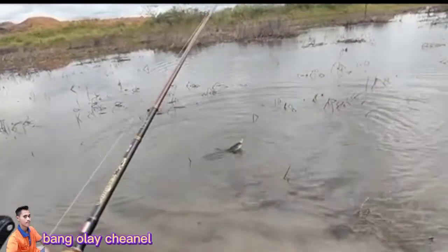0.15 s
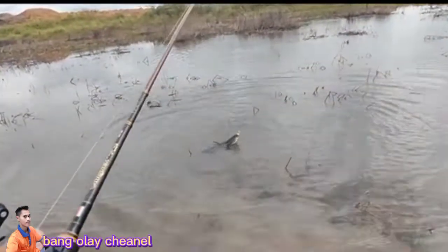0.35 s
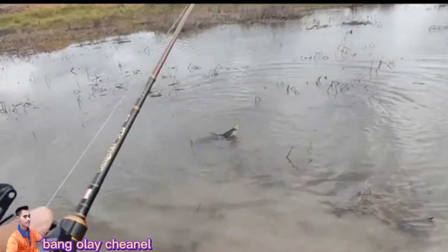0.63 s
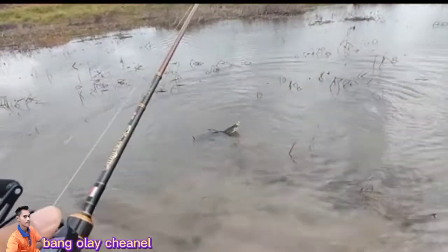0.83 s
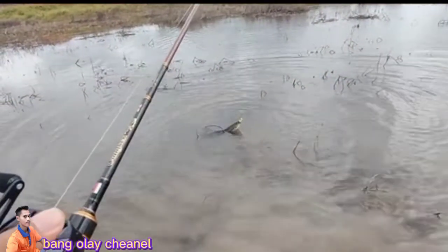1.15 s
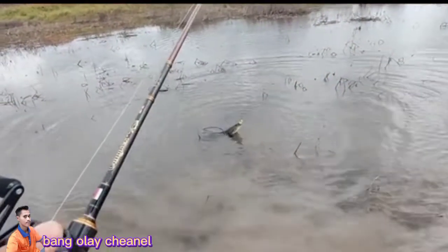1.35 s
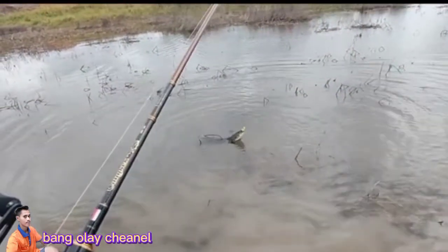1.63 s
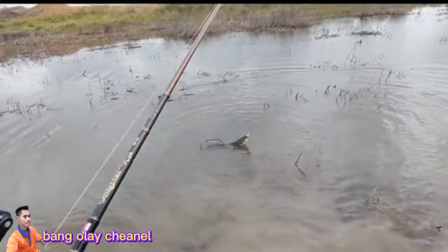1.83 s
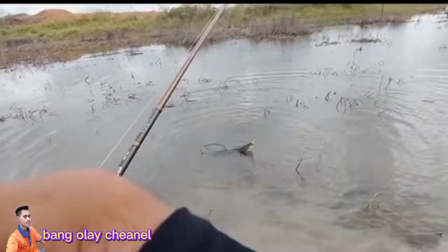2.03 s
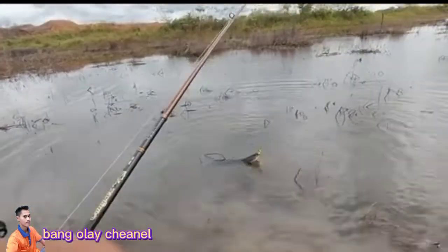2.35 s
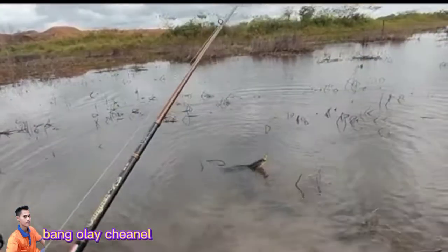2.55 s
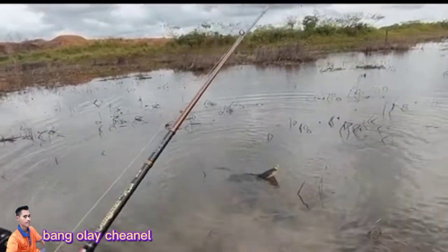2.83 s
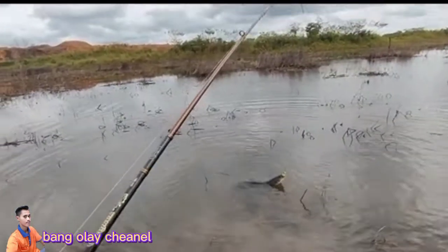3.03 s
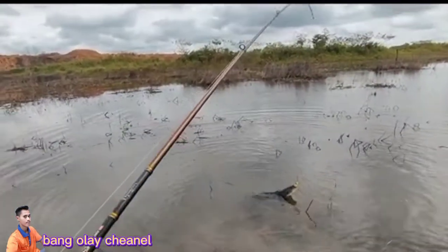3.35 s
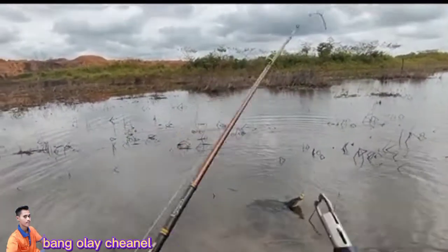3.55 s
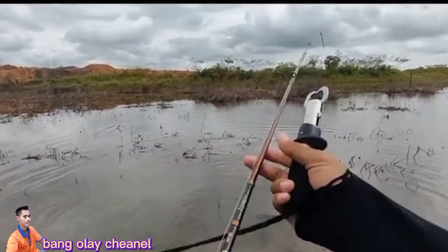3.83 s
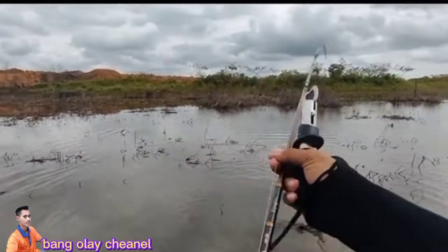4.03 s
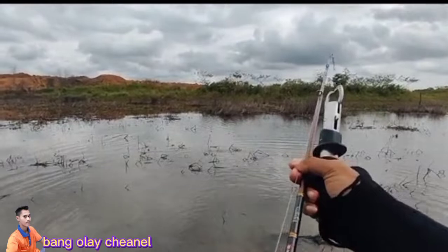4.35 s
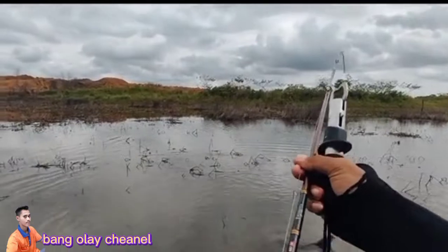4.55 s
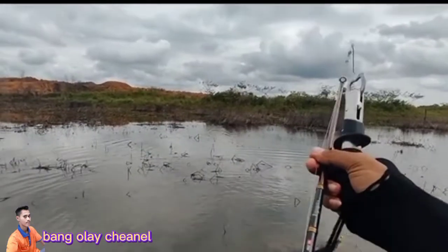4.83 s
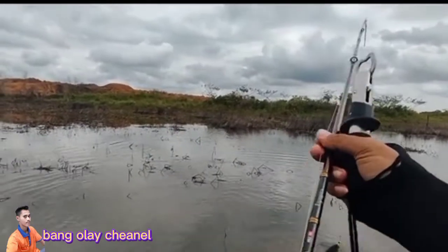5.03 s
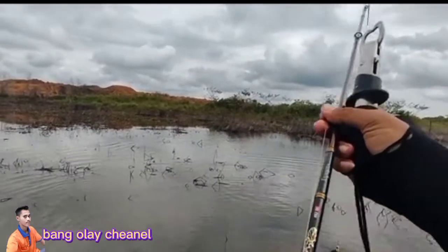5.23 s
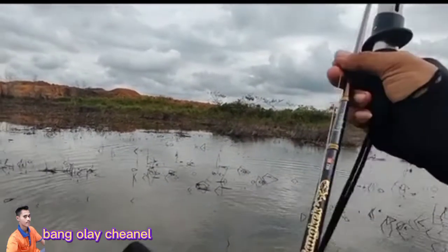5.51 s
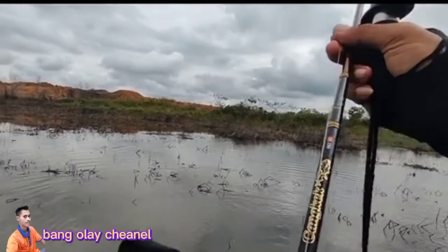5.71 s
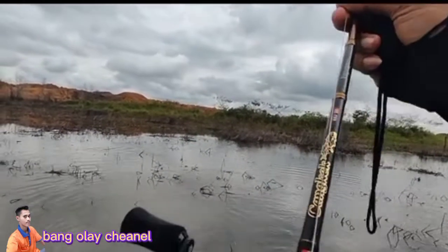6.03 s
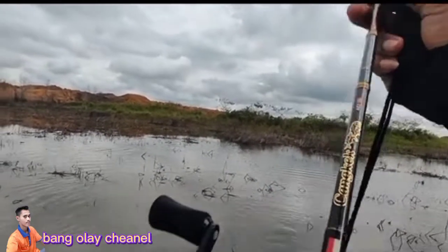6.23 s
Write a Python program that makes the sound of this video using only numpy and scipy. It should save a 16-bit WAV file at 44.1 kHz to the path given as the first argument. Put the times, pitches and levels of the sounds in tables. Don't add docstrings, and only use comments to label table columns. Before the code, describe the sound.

Faint bird peeps and twitters over soft breeze and thin insect shimmer, with cloth rub, a hard tap, small clicks and one loud hollow knock.

```python
import sys
import numpy as np
from scipy import signal
from scipy.fft import rfft, irfft, next_fast_len
from scipy.io import wavfile
from scipy.ndimage import uniform_filter1d, map_coordinates

SR = 44100
rng = np.random.default_rng(int(sys.argv[2]) if len(sys.argv) > 2 else 0)


def master_out(mix):
    frames = np.transpose(np.atleast_2d(mix))
    ceiling = np.clip(frames, -1, 1)
    pcm = np.round(ceiling * 32767).astype(np.int16)
    wavfile.write(sys.argv[1], SR, pcm)


def ratio_of_db(decibels):
    return 10 ** (np.asarray(decibels, float) / 20)


N = 281358

# time_s, level_db
BREEZE_CURVE = [(0, -36.5), (.41, -34), (.53, -33.5), (.87, -38.5), (1.06, -37.5), (1.49, -36), (2.22, -36),
                (2.59, -35.5), (3.25, -35.5), (4.25, -35.5), (4.8, -37), (5.63, -35), (5.9, -37),
                (6.38, -35.5)]
# freq_hz, density_db_per_hz
RUMBLE_SPECTRUM = [(12, -21), (20, 3), (30, -5.5), (70, 1.5), (91, -1), (112, -7), (264, -6.5),
                   (363, -12.5), (393, -13.5), (576, -14), (720, -20), (900, -32), (1170, -78),
                   (1980, -120)]
# freq_hz, correlation
RUMBLE_LIKENESS = [(25, 0.42), (60, 0.94), (130, 0.72), (300, 0.89), (600, 0.73), (1200, 0.083)]
# freq_hz, density_db_per_hz
HISS_SPECTRUM = [(500, 13.5), (900, 12.5), (1500, 7), (3000, 7), (6000, 4), (10000, 1.5), (13000, 1.5),
                 (15500, 0.5)]
# time_s, level_db
INSECT_CURVE = [
    (0, -42),
    (.21, -45.5),
    (.5, -42),
    (.87, -46),
    (1.1, -47.5),
    (1.5, -45),
    (2.6, -45),
    (3.25, -42.5),
    (4.4, -41.5),
    (6.38, -40),
]
# center_hz, width_hz, level_db
WING_MODES = [(8597, 1060, 11), (10050, 1100, -1.5)]
# start_s, pitch_hz, peak_db
PINGS = [(1.508, 1920, -28), (1.665, 1910, -25), (1.888, 1940, -33), (2.015, 1890, -27), (2.5, 5840, -25),
         (3.452, 1900, -29), (3.461, 1390, -28), (4.116, 1880, -27), (4.118, 1070, -33), (4.484, 950, -26),
         (4.537, 1900, -35), (.803, 7400, -29), (.643, 1340, -21), (5.443, 6200, -31)]
# center_s, pitch_hz, peak_db
PUSHES = [
    (0.416, 62, -22.5),
    (1.489, 43, -26.5),
    (1.6495, 477, -25.5),
    (1.6525, 620, -24.5),
]
# center_hz, width_hz, level_db
SHELL_MODES = [(1450, 500, -1.5), (2050, 260, 7.5), (2780, 780, -5.5)]
# center_hz, width_hz, level_db
HOLLOW_MODES = [(275, 150, -6.5), (1067, 135, 2.5)]
# start_s, length_s, level_db
SCRAPES = [
    (1.604, .042, -37),
    (2.81, .03, -47),
    (4.53, .06, -48),
    (5.285, .03, -43),
    (5.45, .13, -42),
    (5.918, .034, -37),
    (4.572, .02, -42),
    (6.22, .06, -48),
]
# start_s, ring_db, crack_over_ring_db, left_over_right_db
KNOCKS = [(0.595, -24, -14, -3), (0.803, -33, 16, 4), (1.612, -17.5, 4, -2), (1.653, -31, 7, 1),
          (2.062, -29.5, -6, -2), (2.503, -24, 7, -1), (2.545, -25.5, -12, .6), (2.595, -27.5, -5.5, -3),
          (2.702, -29.5, -10, -3), (2.75, -32.5, 14, -1), (3.707, -27, 2, -5), (4.2837, -3.5, 0.5, -3.5),
          (4.296, -28, 16, -5), (4.317, -26, -8, 0), (4.584, -18.5, -12, -2.5), (4.857, -22.5, 8.5, -4),
          (5.481, -29, -5, -3), (5.504, -26, -2, 2), (5.537, -22.5, -2, -4), (5.562, -17.5, -19, 0),
          (5.622, -27.5, 13.5, -9), (5.709, -26.5, 11, -6), (5.934, -31, -6, -9), (6.277, -30, -2, 1.5)]
# start_s, ring_db, crack_over_ring_db, left_over_right_db
TAPS = [(0.203, -34, -5, 4.5), (.874, -5, 3.5, 3.5), (0.8792, -25.5, 6, 1.5), (1.605, -22, 4, 11),
        (1.629, -17, 2, 8), (1.634, -23.5, -13, -7), (2.4, -27, 7, 0), (2.662, -35, 15, 1),
        (2.823, -26, 9, -1), (4.116, -33, 2, 0), (5.294, -32, 15, .6), (5.456, -27, 6, 0),
        (5.527, -22, 0, 0)]
# time_s, level_db, left_over_right_db
SLEEVE_CURVE = [
    (.1, -60, 13),
    (.19, -42.5, 6),
    (.22, -35.5, 7.5),
    (.33, -33.5, 5),
    (.42, -34, 1.5),
    (.5, -37.5, -8.5),
    (.58, -37, -2.5),
    (.63, -43.5, -8),
    (.72, -44.5, 9),
]
# freq_hz, density_db_per_hz
CLOTH_SPECTRUM = [(180, -39), (300, -5.5), (348, -3), (476, -10), (581, -9), (1180, -8.5), (2930, -5),
                  (4210, -13), (8840, -15), (15500, -23.5)]
# start_s, length_s, start_hz, end_hz, level_db
FLICKS = [(.048, 0.021, 3900, 4440, -37), (0.18, 0.023, 3400, 4300, -34), (.176, .028, 4250, 2400, -40),
          (.015, 0.014, 4900, 4100, -42), (.105, 0.021, 4300, 2700, -37), (.8, 0.03, 4400, 3900, -48),
          (.845, 0.018, 3200, 3900, -49), (0.76, 0.018, 3800, 3800, -39), (0.84, 0.022, 3750, 2400, -35),
          (0.8, 0.017, 3150, 3630, -50), (4.655, 0.037, 5750, 5000, -50), (4.71, .022, 5250, 4800, -47),
          (7.1, .012, 3400, 3400, -38), (2.1, .025, 2600, 2200, -46), (1.685, .03, 3800, 3800, -39),
          (4, .032, 3800, 2300, -31), (3.548, 0.018, 3700, 3300, -42), (4.7, .03, 3300, 3800, -39),
          (3.995, 0.024, 4000, 3300, -47), (2.1, 0.033, 3200, 3700, -35), (2.755, .016, 1800, 2720, -38),
          (5.138, 0.023, 3520, 3660, -42), (5.148, .028, 5300, 5600, -50), (5.64, .03, 3800, 3620, -46),
          (2.5, 0.012, 3500, 3900, -35.5), (2.175, 0.013, 3500, 2600, -42.5),
          (2.715, .014, 3400, 2800, -45), (2.262, 0.027, 3600, 3340, -41.5), (2.53, .032, 3000, 3750, -41),
          (1.8, .012, 5100, 4100, -43), (3.2, 0.023, 3800, 4700, -28), (3.4, 0.018, 4400, 3400, -36),
          (2.6, 0.018, 3420, 4800, -30.5), (2.94, 0.022, 3600, 3900, -35), (2.978, 0.008, 4370, 3000, -35),
          (2.991, 0.018, 3650, 4350, -27), (3.6, 0.015, 2470, 3300, -40), (3.026, 0.066, 4110, 2260, -38)]
# start_s, length_s, start_hz, end_hz, level_db
WHISTLES = [(.17, 0.067, 5520, 5000, -39.5), (.325, 0.061, 2450, 4050, -39), (.778, 0.1, 1970, 2040, -48),
            (1.008, 0.089, 2400, 3780, -44.5), (1.074, 0.037, 4470, 4100, -52),
            (1.2, 0.11, 2920, 2410, -42), (1.41, 0.14, 1450, 1400, -52.5), (2.128, 0.054, 2900, 1900, -43),
            (2.207, 0.044, 1930, 2820, -54), (2.352, 0.057, 3210, 3210, -38),
            (2.469, 0.07, 2650, 2050, -43), (2.725, 0.049, 2780, 2790, -35),
            (2.668, 0.012, 3300, 4120, -43), (1.915, 0.027, 3850, 3330, -51),
            (2.881, 0.082, 2280, 1780, -47.5), (3.2, 0.037, 2900, 2680, -45),
            (3.24, 0.098, 2610, 3100, -41), (3.305, 0.054, 3050, 4250, -41),
            (3.447, 0.055, 2790, 2500, -39), (3.644, 0.073, 2050, 2800, -46), (3.695, .05, 2750, 3950, -46),
            (3.875, 0.047, 1870, 1650, -48), (5.408, 0.043, 4050, 4100, -49),
            (6.216, 0.055, 4310, 4320, -40.5)]
# freq_hz, gain_db
THROAT_RESPONSE = [(500, 4), (1200, 1), (1750, -13), (2250, -17), (2800, -7.5), (3300, -7), (3800, -14),
                   (4300, -15), (5150, -7), (5750, -21), (6500, -40)]
# top_s, top_hz, level_db, throat_resonance_db, length_ratio
LOW_PEEPS = [(.117, 1300, -37.5, 5.5, 1.1), (.389, 1163, -40, -10, 1.23), (.68, 1225, -38, -1.5, 1.1),
             (.945, 1096, -42.5, 3.5, 0.78), (1.223, 1117, -43, 5, 0.92), (1.515, 920, -44.5, 3.5, .55),
             (1.762, 1190, -39, 4, 1.19), (2.042, 1098, -37.5, 3.5, 0.85), (2.31, 1042, -41.5, 4.5, 0.65),
             (2.588, 1026, -38, 2.5, 0.74), (2.845, 942, -35.5, -4, .7), (3.118, 928, -43.5, 3.5, 0.97),
             (3.39, 925, -46.5, 9, .75), (3.621, 1042, -40, 2.5, 0.88), (3.901, 1054, -41, 3, .7),
             (4.208, 759, -44, -3, .9), (4.406, 1087, -41, 5, 0.86), (4.904, 1116, -36.5, 0.5, 0.83),
             (5.184, 928, -40.5, 2, 0.68), (5.428, 1028, -42, -5, 0.75), (5.695, 1050, -44, 8, 0.63),
             (6.172, 1012, -41.5, 5, 0.83)]
# top_s, top_hz, level_db, throat_resonance_db, length_ratio
HIGH_PEEPS = [(.008, 1814, -41, -2, 0.66), (.703, 1750, -45, -3, 1.01), (.975, 1713, -47.5, -5, 0.85),
              (1.592, 1754, -40, -3, 1.1), (1.8, 1750, -44, -4, 1.07), (2.045, 1734, -42, -1, 1.1),
              (2.379, 1707, -39.5, -1, 0.9), (2.61, 1630, -48, -1.5, 0.96), (2.855, 1735, -44, 1, 1.08),
              (3.152, 1688, -44, -1, 1.01), (3.485, 1670, -41.5, -5.5, 1.26), (3.715, 1728, -42.5, 2, 1.1),
              (3.955, 1744, -41, -3, 1.22), (4.247, 1570, -39.5, -7, 0.93), (4.49, 1553, -39, -3, 1.1),
              (4.995, 1580, -40, -1, 0.92), (5.315, 1492, -42, 1, 1.12), (5.528, 1706, -42.5, -4, 0.89),
              (5.752, 1638, -43.5, -1, 1.1), (6.015, 1525, -42.5, -0.5, 1.03), (6.24, 1460, -38, -7, 0.94)]

MIC_DELAY_SAMPLES = 22


def unit(x):
    return x / np.sqrt(np.mean(x ** 2) + 1e-20)


def along(points, hz):
    f, v = np.transpose(points)
    return np.interp(np.log(hz + 1), np.log(f + 1), v)


def curves(rows):
    s, *cols = np.transpose(rows)
    return [np.interp(np.arange(N) / SR, s, c) for c in cols]


def wobble(rate_hz):
    knots = rng.standard_normal(int(N * rate_hz / SR) + 4)
    return map_coordinates(knots, [np.arange(N) * rate_hz / SR])


def filtered(x, response):
    m = next_fast_len(N + SR // 2)
    return irfft(rfft(x, m) * response(np.fft.rfftfreq(m, 1 / SR)), m)[..., :N]


def resonances(modes):
    def response(f):
        total = 0
        for k, (center, width, db) in enumerate(modes):
            total = total + (-1) ** k * ratio_of_db(db) * 1j * f * width / (center * center - f * f + 1j * f * width)
        return total
    return response


def rush(spectrum, likeness, patchy_db):
    z = signal.stft(rng.standard_normal((2, N)), nperseg=512)[2]
    patches = uniform_filter1d(rng.standard_normal(z.shape[1:]), 6, 0)
    patches = uniform_filter1d(patches, 14, 1)
    pair = signal.istft(z * ratio_of_db(patchy_db * unit(patches)), nperseg=512)[1][:, :N]

    def spread(hz):
        angle = np.arccos(np.clip(along(likeness, hz), -1, 1)) / 2
        return ratio_of_db(along(spectrum, hz)) * [np.cos(angle), np.sin(angle)]
    mid, side = filtered(pair, spread)
    return unit(np.array([mid + side, mid - side]))


def add(track, start_s, sound):
    track[round(start_s * SR):][:len(sound)] += sound


def fade(size, edge):
    u = np.linspace(0, 1, size)
    return np.sin(np.pi / 2 * np.clip(np.minimum(u, 1 - u) / edge, 0, 1)) ** 2


def rumble():
    (breeze_db,) = curves(BREEZE_CURVE)
    level = ratio_of_db(breeze_db + 0.93 + 0.75 * wobble(5.7))
    left, right = level * rush(RUMBLE_SPECTRUM, RUMBLE_LIKENESS, patchy_db=1.5)
    return np.array([left, np.roll(right, MIC_DELAY_SAMPLES // 2)])


def breeze_hiss():
    (breeze_db,) = curves(BREEZE_CURVE)
    hiss_db = -52.5 + 2 * (breeze_db + 36.0)
    level = ratio_of_db([[1.3], [-1.2]]) * ratio_of_db(hiss_db + 12.5 + 0.16 * wobble(15.0))
    return level * rush([(250, -45), *HISS_SPECTRUM], [(500, 0.036), (2000, 0.023)], patchy_db=3.0)


def insects():
    (level_db,) = curves(INSECT_CURVE)
    t = np.arange(N) / SR
    beat = 1 + 0.15 * np.sin(2 * np.pi * np.cumsum(156 + 5 * wobble(6.0)) / SR)
    scraping = rng.standard_normal((2, N)) * beat * ratio_of_db(0.95 * wobble(60))
    chorus = unit(filtered(scraping, lambda hz: resonances(WING_MODES)(hz) ** 2))
    chirps = np.clip(np.sin(2 * np.pi * np.cumsum(8.7 + 0.9 * wobble(1.3)) / SR), 0, 1)
    chirps = chirps * (1 + np.sin(2 * np.pi * 136 * t))
    cricket = rng.standard_normal((2, N)) * chirps
    cricket = unit(filtered(cricket, lambda hz: resonances([(7230, 300, 0)])(hz) ** 2))
    return ratio_of_db(level_db) * (ratio_of_db([[4.5], [.8]]) * chorus + ratio_of_db(-12.5 + 1.5 * wobble(0.64)) * cricket)


def pings():
    out, t = np.zeros(N + SR), np.arange(0, .03, 1 / SR)
    for start_s, hz, db in PINGS:
        envelope = ratio_of_db(db - 60 * t / .028) * (1 - np.exp(-t / .0015))
        add(out, start_s, envelope * np.sin(2 * np.pi * hz * t))
    return out[:N] * ratio_of_db([[1.5], [-1.5]])


def pushes():
    out = np.zeros(N + SR)
    for center_s, hz, db in PUSHES:
        u = np.arange(-1, 1, hz / SR)
        add(out, center_s - 1 / hz, ratio_of_db(db) * np.sin(2 * np.pi * u) * np.cos(np.pi / 2 * u) ** 2)
    return out[:N]


def scrapes():
    level = np.zeros(N + SR)
    for start_s, length_s, db in SCRAPES:
        add(level, start_s, ratio_of_db(db) * fade(round(length_s * SR), edge=0.25))
    slips = rng.random(N) < 2600 / SR
    jerks = slips * ratio_of_db(1.5 * rng.exponential(size=N)) * rng.standard_normal(N)
    jerks = jerks + 0.025 * rng.standard_normal((2, N))
    housing = lambda hz: resonances(SHELL_MODES)(hz) + ratio_of_db(8) * resonances(HOLLOW_MODES)(hz)
    return level[:N] * unit(filtered(jerks, housing))


def ticks():
    hollow, shell, crack = np.zeros((3, 2, N + SR))
    t = np.arange(-.003, .006, 1 / SR)
    crack_shape = np.where(t < 0, ratio_of_db(60 * t / 0.015), ratio_of_db(-60 * t / 0.011))
    contacts = [(row, 0, -11) for row in KNOCKS]  # row, hollow_db, shell_db
    contacts += [(row, -3.5 - 0.36 * (row[1] + 25), 0) for row in TAPS]
    for (start_s, db, crack_db, pan_db), hollow_db, shell_db in contacts:
        ears = ratio_of_db(np.array([pan_db, -pan_db]) / 2)[:, None]
        at = round((start_s + .0008) * SR)
        shell_bounce, hollow_bounce = at + round(0.001147 * SR), at + round(0.001834 * SR)
        hollow[:, [at, hollow_bounce]] = ears * ratio_of_db(db + hollow_db + 30.5) * [1, .7]
        shell[:, [at, shell_bounce]] = ears * ratio_of_db(db + shell_db + 27.5) * [1, .5]
        grit = rng.standard_normal(len(t)) + 0.75 * rng.standard_normal((2, len(t)))
        burst = ears * ratio_of_db(db + crack_db - 12.5) * crack_shape * grit
        add(crack.T, start_s + 0.00081 + t[0], burst.T)
    ring = filtered(hollow[:, :N], resonances(HOLLOW_MODES))
    ring = ring + filtered(shell[:, :N], resonances(SHELL_MODES))
    ring = filtered(ring, lambda hz: 1 / (1 + 1j * hz / 3000))
    return ring + filtered(crack[:, :N], resonances([(6000, 5100, 0)]))


def sleeve():
    approach, leaving = [(0, -86, 0)], [(.8, -50, 0), (.86, -55, 0), (.9, -97, 0)]
    level_db, pan_db = curves([*approach, *SLEEVE_CURVE, *leaving])
    dull_db = np.clip(77 * (np.arange(N) / SR - 0.53), 0, 7.5)
    grains = ratio_of_db(2.2 * wobble(400) + 1.1 * wobble(60))
    cloth = unit(grains * rush(CLOTH_SPECTRUM, [(400, .5), (2000, .2), (6000, .1)], patchy_db=1.8))
    low = filtered(cloth, lambda hz: 1 / (1 + (hz / 1500) ** 4))
    return ratio_of_db(level_db + 3.0 + np.outer([.5, -.5], pan_db)) * (cloth + (ratio_of_db(dull_db) - 1) * low)


def twitter():
    out = np.zeros(N + SR)
    for notes, bow in (FLICKS, 0.068), (WHISTLES, 0.002):
        for start_s, length_s, start_hz, end_hz, db in notes:
            u = np.linspace(-1, 1, round(length_s * SR))
            sweep_hz = end_hz - start_hz
            hz = (start_hz + end_hz + sweep_hz * u) / 2 + bow * abs(sweep_hz) * (1 - u ** 2)
            tone = np.sin(2 * np.pi * np.cumsum(hz) / SR)
            add(out, start_s, ratio_of_db(db + 3) * fade(len(u), edge=0.15) * tone)
    return out[:N] * ratio_of_db(1.5 * wobble(90)) * (1 + .18 * wobble(700))


def chick(peeps, arch, shape, partials_db):
    rise_s, fall_s, bend, beak_db, sag_db = arch
    begin, rounder, end_hz = shape
    out, shake = np.zeros(N + SR), wobble(70)
    flutter = [wobble(55) for _ in partials_db]
    rasp = [wobble(1100) for _ in partials_db]
    for top, top_hz, db, throat_db, pace in peeps:
        start, end = max(top - pace * rise_s, 0), top + pace * fall_s
        t = np.arange(start, end, 1 / SR)
        here = np.minimum((t * SR).astype(int), N - 1)
        up = top_hz * (1 - (1 - begin) * (np.abs(top - t) / (top - start)) ** bend)
        down = top_hz - (top_hz - end_hz) * (np.abs(t - top) / (end - top)) ** (bend + rounder)
        hz = np.where(t < top, up, down) * (1 + 0.00896 * shake[here])
        phase, voice = 2 * np.pi * np.cumsum(hz) / SR, 0
        mouth = [(2000, 0), (2600, throat_db), (3800, throat_db), (4400, beak_db)]
        for k, part_db in enumerate(partials_db, 1):
            overtone = k > 1
            effort_db = overtone * (sag_db * (hz / top_hz - 1) + 5 * np.minimum(flutter[k - 1][here], .4))
            tract_db = along(THROAT_RESPONSE, k * hz) + along(mouth, k * hz)
            breathy = 1 + .3 * overtone * rasp[k - 1][here]
            voice = voice + ratio_of_db(part_db + tract_db + effort_db) * breathy * np.sin(k * phase)
        level = ratio_of_db(db + 4 + 1.5 * flutter[0][here])
        add(out, start, level * fade(len(t), edge=.15) * voice)
    return out[:N]


def bank_scatter(x, t60_s=0.054):
    t = np.arange(SR // 5) / SR
    tail = rng.standard_normal((2, len(t))) * ratio_of_db(-60 * t / t60_s)
    return signal.fftconvolve(x[None], tail / np.linalg.norm(tail[0]), axes=1)[:, :N]


def birds():
    low = chick(LOW_PEEPS, arch=(0.07, .08, 1.9, 2.1, 24), shape=(.68, 0.1, 644.5),
                partials_db=[-4.0, -1.5, 4.5, 2.0, 5.0, 8.0, 0])
    high = chick(HIGH_PEEPS, arch=(.032, .09, 1.9, 0.47, 25), shape=(.85, 0.296, 585),
                 partials_db=[0.59, 9.3, 8.7, 1.9])
    song = low + high + twitter()
    shade = [(1500, 0), (3100, 2), (4200, -3), (5200, -8)]  # freq_hz, gain_db
    right = filtered(np.roll(song, MIC_DELAY_SAMPLES), lambda hz: ratio_of_db(along(shade, hz)))
    return np.array([song, right]) + ratio_of_db(-8.5) * bank_scatter(song)


def scene():
    background = rumble() + breeze_hiss() + insects() + pings()
    handling = pushes() + scrapes() + ticks() + sleeve()
    return background + handling + birds()


def top_cut(x):
    return signal.sosfilt(signal.butter(12, 16310, fs=SR, output="sos"), x)


def record(dry):
    limited = filtered(dry, lambda hz: hz < 15600)
    mix = np.clip(limited - .0012, -1, 1)
    return top_cut(mix)


dry = scene()
out = record(dry)
master_out(out)
```